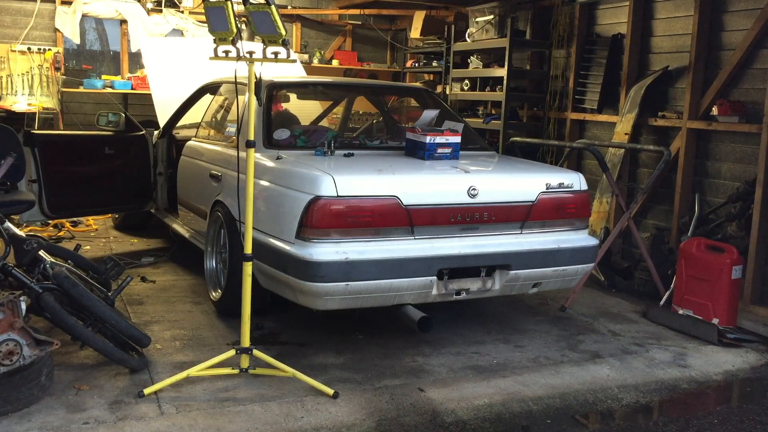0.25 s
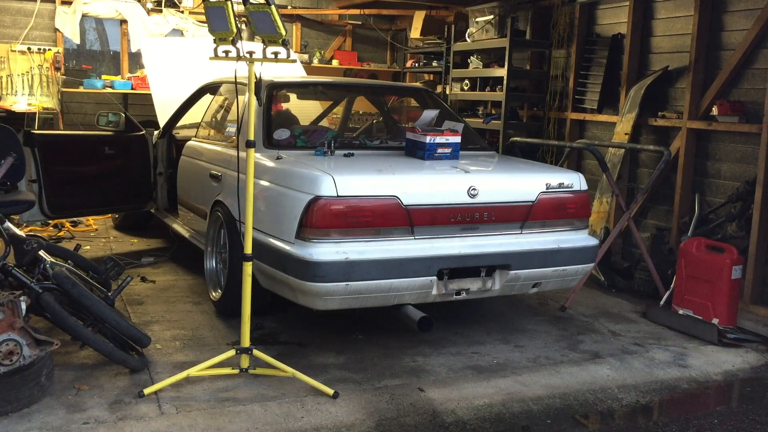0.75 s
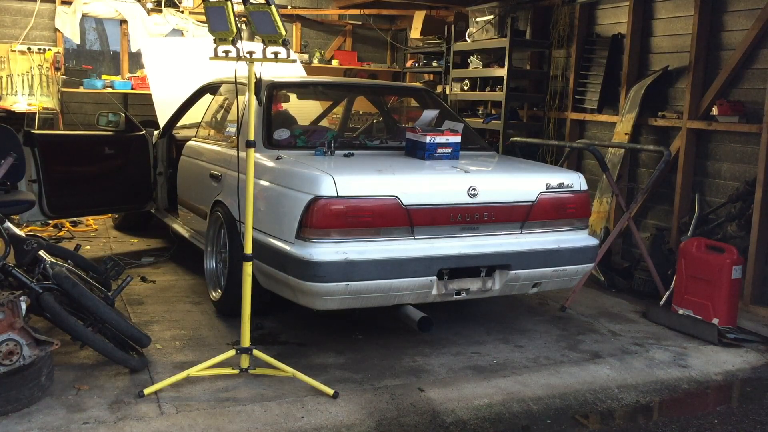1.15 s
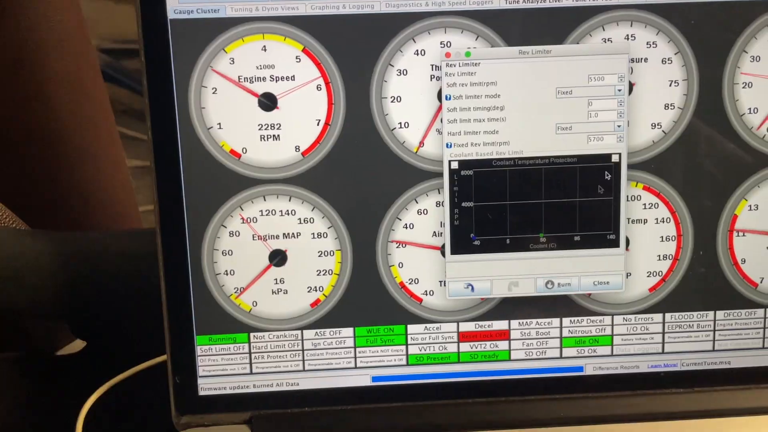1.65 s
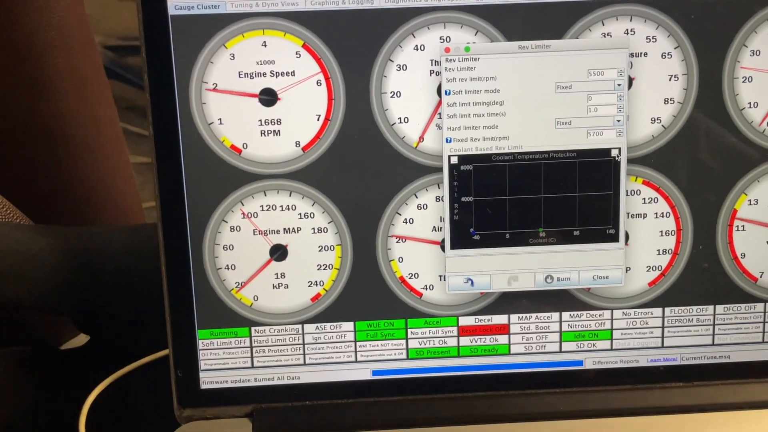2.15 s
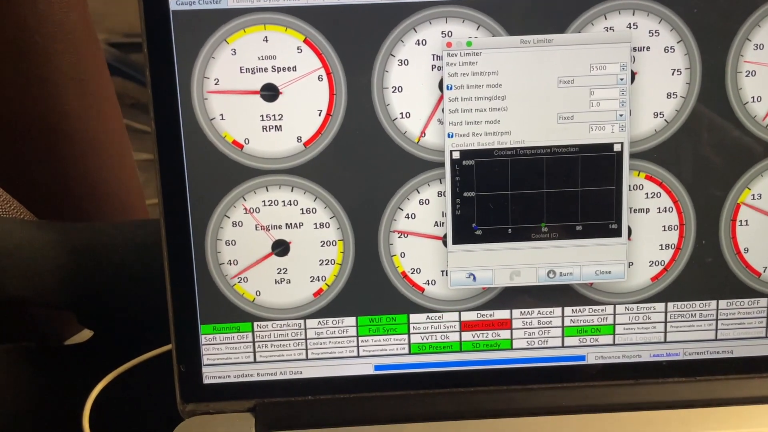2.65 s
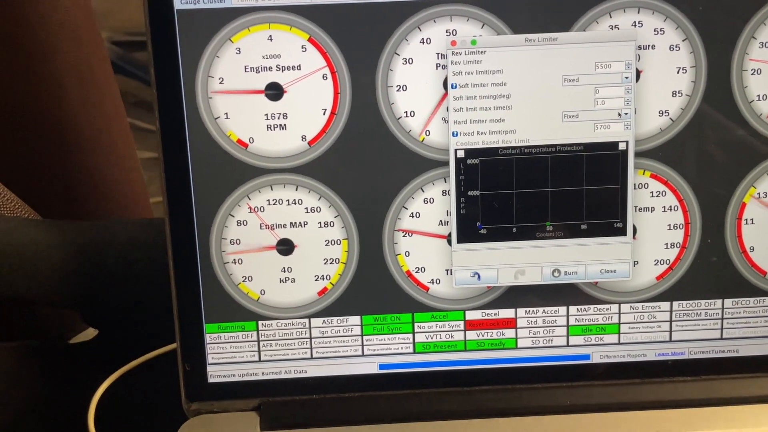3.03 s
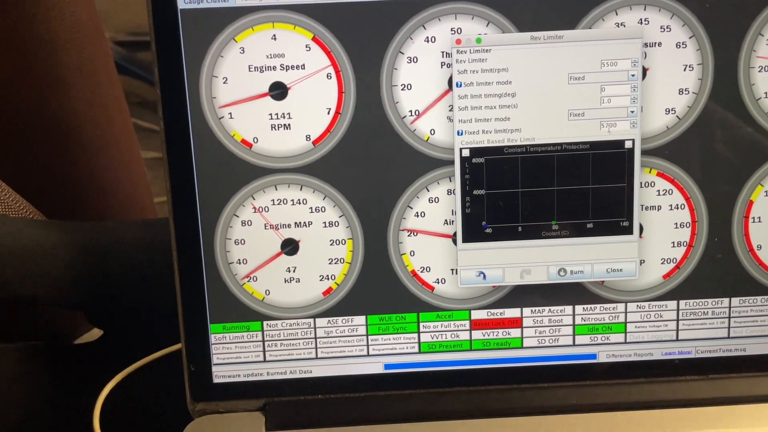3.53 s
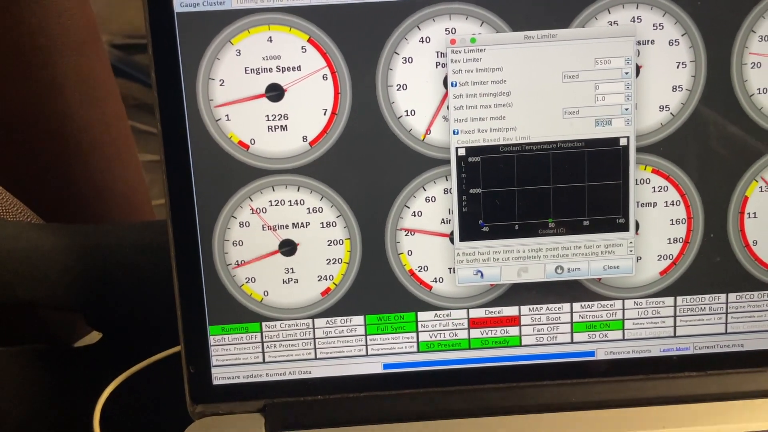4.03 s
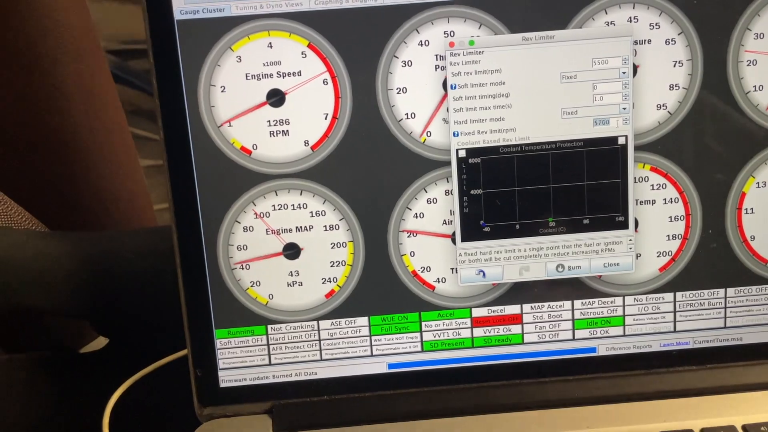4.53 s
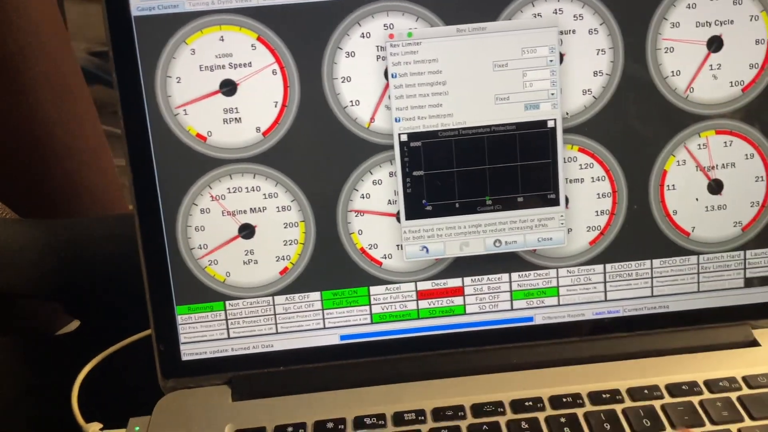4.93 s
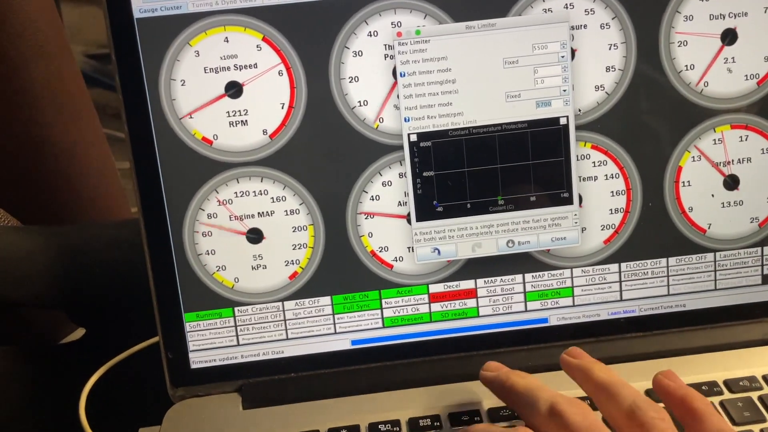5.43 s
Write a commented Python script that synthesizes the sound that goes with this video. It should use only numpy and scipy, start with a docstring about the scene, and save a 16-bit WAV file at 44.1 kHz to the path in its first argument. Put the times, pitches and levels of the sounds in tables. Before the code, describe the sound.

A car engine gives two quick, raspy revs with sharp exhaust cracks, picked up behind the tailpipe in a garage. Then the microphone is suddenly inside the car, where a low, muffled boom rises and falls with repeated light taps on the gas pedal. Air hisses softly on each tap, valves whirr and a turbo whines faintly underneath. A few quiet laptop clicks come late.

```python
"""Revving a turbo engine in a garage

A six-cylinder engine is revved in short bursts, heard from behind the car, then from the driver's seat.
Each firing (fuel burning in a cylinder) booms in the exhaust, rings the pipe and lets out a raspy puff.
Inside, the boom remains, with softer gas, hissing intake air, whirring valves and a few laptop clicks.
The turbo whines faintly underneath."""
import sys
import numpy as np
from scipy import signal
from scipy.fft import rfft, irfft
from scipy.io import wavfile
from scipy.ndimage import uniform_filter1d, minimum_filter1d

SR = 44100
rng = np.random.default_rng(int(sys.argv[2]) if len(sys.argv) > 2 else 0)


def waveform_to_disk(signal):
    """Save audio, clipped to [-1, 1], as 16-bit WAV at the path in sys.argv[1]."""
    frames = np.transpose(np.atleast_2d(signal))
    scaled = np.clip(frames, -1, 1) * 32767
    samples = np.round(scaled).astype(np.int16)
    wavfile.write(sys.argv[1], SR, samples)


N = 250488
T = np.arange(N) / SR

MOVE_INSIDE_S = 1.602
REFERENCE_HZ = 60  # firing rate that speed-dependent levels are counted from

# Levels in the tables are relative: filters and the mix still change them.
# firings per second, which set the engine's pitch: (time [s], rate [Hz])
FIRING_RATE_OUTSIDE = [(0, 44.5), (.1, 49.8), (.17, 49.8), (.25, 55.6), (.33, 64.8), (.41, 67.5), (.6, 57),
                       (.7, 52), (.8, 44), (.9, 39.5), (.98, 42.2), (1.05, 47.6), (1.12, 51), (1.18, 51.7),
                       (1.25, 61.2), (1.35, 68), (1.6, 57.5)]
FIRING_RATE_CABIN = [(1.6, 111), (1.8, 95.7), (2.07, 79.5), (2.11, 80), (2.2, 91), (2.27, 92.5), (2.45, 80),
                     (2.63, 69.7), (2.75, 74), (2.88, 86.5), (3.13, 72.3), (3.31, 60.6), (3.4, 57),
                     (3.49, 64.5), (3.55, 64.5), (3.66, 74.5), (4.2, 43.7), (4.43, 68.5), (5.03, 40),
                     (5.13, 48), (5.19, 48.5), (5.41, 70.5), (5.68, 55.5)]
# taps on the gas pedal: (start [s], length [s], opening [0-1], extra intake hiss [dB])
PEDAL_TAPS = [(0.17, 0.21, 0.6, 0), (1.008, 0.056, 0.88, 0), (1.125, 0.22, 0.96, 0),
              (2.045, 0.11, 0.56, -1), (2.639, 0.064, 0.64, 2.5), (2.722, 0.13, 0.43, -0.5),
              (3.396, 0.06, 0.78, 2.5), (3.517, 0.11, 0.54, -2), (4.226, 0.24, 0.27, -2),
              (5.064, 0.095, 0.51, -0.5), (5.197, 0.19, 0.52, 2.5)]
# laptop clicks: (time [s], level [dB])
LAPTOP_CLICKS = [(4.788, -52.5), (5.089, -43), (5.571, -42), (5.575, -47)]
# the turbo speeding up and coasting down: (time [s], pitch [Hz], level [dB])
TURBO_WHINE = [(0, 640, -55), (.15, 685, -52), (.65, 700, -54), (.85, 690, -66), (1.5, 780, -64),
               (1.8, 745, -58), (2.0, 716, -66), (2.4, 808, -57), (2.85, 802, -52.5), (3.25, 716, -57),
               (3.42, 690, -62), (3.84, 678, -54), (4.1, 638, -59), (4.4, 623, -64)]
# loudness of the valves: (time [s], level [dB])
VALVE_LEVEL = [(1.6, -54), (2.1, -60.5), (2.55, -56), (3.1, -56), (3.35, -66), (3.47, -45.5), (3.58, -59),
               (3.72, -62), (4.1, -59), (4.3, -56.5), (4.7, -63), (4.9, -63.5), (5.68, -57)]
# tone of the valves, the intake air and a hard firing's crack: (frequency [Hz], level [dB])
VALVE_TONE = [(900, -24), (1350, 1.5), (1750, 1), (2000, -10), (3400, -12), (6000, -33)]
INTAKE_TONE = [(900, -22), (1750, -2), (2400, -17), (3100, -13), (3700, 0), (4500, 0), (5400, -13),
               (7500, -15), (11500, -16), (14000, -48)]
CRACK_TONE = [(1500, -29), (4300, -10), (5500, -8), (9000, -1), (15500, -12)]
# tone of the escaping gas: (frequency [Hz], level [dB])
GAS_TONE_OUTSIDE = [(400, -15), (760, -12), (1080, -2), (1500, 1.5), (2100, -3), (2330, -10), (2550, -5),
                    (2950, -4.5), (3600, -11), (4200, -7), (4700, -9), (5400, -17), (6600, -16.5),
                    (9300, -20.5), (10300, -26.5), (11500, -23.5), (15500, -33)]
GAS_TONE_CABIN = [(350, -1.5), (750, 1.5), (950, -3), (1200, -2), (1450, -4.5), (1750, -12.5), (2100, -10),
                  (3000, -9), (4200, -16.5), (5500, -15.5), (7000, -25), (11500, -30), (14000, -48)]
# loudness of the exhaust behind the car: (time [s], drone [dB], rasp [dB], treble [dB])
EXHAUST_LEVELS = [(0, -40, -35, -45), (.08, -39, -35, -47), (.16, -40, -38, -49), (.22, -28, -28.5, -33.5),
                  (.32, -26.5, -29.5, -33), (.38, -28, -33.5, -38), (.5, -30.5, -38, -43),
                  (.73, -40, -39.5, -45), (.8, -37, -41, -48), (.88, -38, -47, -53), (.97, -39, -46, -55),
                  (1.02, -32.5, -36, -46), (1.068, -29.5, -25.5, -28.5), (1.11, -31, -35.5, -42),
                  (1.165, -29, -34.5, -39), (1.178, -27, -26, -28), (1.26, -23, -24.5, -26.5),
                  (1.335, -23.5, -30, -32), (1.375, -28, -38, -43), (1.6, -35, -40, -46)]
# gas in the cabin, a row for rasp and one for sizzle relative to it:
# (coasting level [dB], rise per doubling of speed [dB], rise at full throttle [dB])
CABIN_GAS_FLOW = {"rasp": (-52, 1.3, 17), "sizzle": (-13.5, 1.5, -7)}
# pitches at which the cabin air and the pipe ring: (frequency [Hz], width [Hz], boost [dB])
CABIN_RESONANCES = [(371, 18, 2), (406, 18, 6), (462, 22, 5), (595, 40, 6), (1172, 40, 6), (1380, 40, 4),
                    (1720, 60, 5), (1810, 70, 5), (2117, 30, 6)]
PIPE_RESONANCES = [(895, 35, 5), (1065, 35, 7), (1296, 30, 4), (1385, 45, 2), (1659, 22, 6),
                   (1989, 18, 8.5), (2118, 22, 7), (2471, 20, 5), (2887, 30, 2)]
PIPE_DRONE_RESONANCES = [(326, 29, 3.2), (399.5, 7.2, 12), (445, 16, 12), (520, 36, 11.8), (625, 12, 9.4)]
# share of the rasp in the pipe's two main resonances: (time [s], lower [0-1], upper [0-1])
RESONANCE_SHARES = [(0, 0, .7), (.13, 0, .55), (.2, .2, .12), (.33, .28, .04), (.45, .12, .08),
                    (.8, .03, .12), (1, 0, .12), (1.25, .02, 0), (1.6, .04, .05)]
# single hard firings, most as the throttle snaps open: (time [s], level [dB], extra for the crack [dB])
HARD_FIRINGS = [(.1735, -25.5, -9), (.1935, -21, -6), (.213, -25, -1), (.232, -26, -1), (.267, -28, -1),
                (.284, -28, 0), (.362, -30, 0), (.4214, -29, -2), (.763, -29, -11), (1.0105, -29.5, -10),
                (1.034, -25.5, -1), (1.054, -24, 2), (1.073, -26, 4), (1.133, -22.5, -6), (1.172, -22.5, 2),
                (1.1915, -28, 3), (1.21, -27, 1), (1.26, -23, 1), (1.509, -37, 0), (1.543, -38, 2)]
# tone of the engine's drone: (frequency [Hz], level [dB])
DRONE_TONE_OUTSIDE = [(110, -28.5), (185, -11.5), (215, 8.5), (243, 9.5), (285, 1.5), (325, 2), (365, -7.5),
                      (430, -12), (500, -17.5), (620, -16.5), (760, -26), (900, -10.5), (1500, -84)]
DRONE_TONE_CABIN = [(170, -37), (215, 1.5), (270, 3.5), (330, 7), (420, 4.5), (480, 0), (590, 0.5),
                    (700, -4.5), (850, -13.5), (1200, -46), (5000, -95)]
# loudness of the drone inside: (time [s], level [dB])
DRONE_LEVEL_CABIN = [(1.6, -44.5), (2.04, -44.5), (2.12, -36.5), (2.22, -36.5), (2.35, -44), (2.6, -46),
                     (2.7, -35), (2.88, -40.5), (3.37, -47), (3.45, -36.5), (3.65, -40.5), (4.15, -53.5),
                     (4.33, -42), (4.48, -37), (4.55, -46), (5.03, -51), (5.37, -33), (5.46, -41.5),
                     (5.68, -48.5)]
# low resonances shaken by uneven firings: (frequency [Hz], level [dB])
SHAKE_TONE_OUTSIDE = [(25, -42.5), (40, -26), (54, 1.5), (72, -35), (92, -3), (125, -14), (160, -2),
                      (200, -9.5), (240, -15), (330, -96), (1500, -110)]
SHAKE_TONE_CABIN = [(25, -42.5), (40, -8.5), (53, 9), (68, 6), (88, 10), (110, 8.5), (140, 8.5), (195, 7),
                    (235, -13), (330, -61), (1500, -110)]
# boom tones at 1, 2 and 3 times the firing rate: (time [s], first [dB], second [dB], third [dB])
BOOM_LEVELS_OUTSIDE = [(0, -29, -38, -33), (.1, -34, -29, -29), (.2, -30, -21, -29), (.3, -20, -15.5, -26),
                       (.4, -36, -29, -20.5), (.55, -25, -17.5, -26), (.65, -24, -23.5, -24.5),
                       (.75, -28.5, -32, -33), (.87, -43, -29, -36), (.97, -45, -38, -24),
                       (1.07, -23, -15.5, -24), (1.13, -38, -29, -25), (1.2, -24, -13, -23),
                       (1.27, -17, -13, -24), (1.31, -20, -18, -20), (1.35, -35, -25, -22.5),
                       (1.42, -27, -21, -24), (1.52, -28, -20, -27), (1.6, -28, -23, -26)]
BOOM_LEVELS_CABIN = [(1.6, -20, -34, -65), (1.75, -21.5, -39, -48), (1.949, -23, -28, -57),
                     (2.05, -22.5, -38, -57), (2.08, -28.5, -31, -53), (2.15, -16.5, -24.5, -43.5),
                     (2.28, -30, -25.5, -47.5), (2.3, -21, -23, -44.5), (2.45, -20.5, -38, -59),
                     (2.65, -28, -21.5, -41.5), (2.72, -21.5, -35, -37.5), (2.75, -35.5, -25.5, -43),
                     (2.82, -18.5, -28, -34), (2.97, -20.5, -31.5, -51), (3.12, -28.5, -24.5, -44.5),
                     (3.35, -29.5, -33.5, -30), (3.37, -32, -51, -54), (3.4, -27, -24.5, -38),
                     (3.5, -20, -28.5, -38), (3.52, -32.5, -30.5, -41), (3.65, -22, -21, -47),
                     (3.67, -20, -42, -37), (3.7, -34, -28, -43.5), (3.95, -24.5, -28, -30.5),
                     (4.149, -25, -33.5, -34.5), (4.2, -39, -24.5, -34), (4.371, -19, -25.5, -30.5),
                     (4.4, -35, -24.5, -41), (4.5, -27, -28, -37.5), (4.65, -25.5, -26, -34),
                     (4.72, -22.5, -29.5, -28.5), (4.87, -25.5, -29, -34), (4.94, -40, -26, -37),
                     (5.02, -39, -38, -38), (5.09, -37, -22.5, -31.5), (5.139, -28, -19, -23.5),
                     (5.17, -27, -36, -43), (5.22, -23.5, -23.5, -24.5), (5.32, -18, -22.5, -30.5),
                     (5.54, -27, -25.5, -33.5), (5.68, -23, -25.5, -35)]
# strength of each of the six cylinders: (level [dB])
CYLINDER_DB = np.array([1.4, -0.7, 2.0, -1.5, 1.5, -0.5])


def undb(db):
    """Turn decibels into a volume multiplier."""
    return 10 ** (np.asarray(db) / 20)


def unit(x):
    """Scale a signal to an average (rms) size of 1."""
    return x / np.sqrt(np.mean(x ** 2))


def curves(table):
    """Join a table's timed points with straight lines, one curve per column."""
    times, *columns = np.transpose(table)
    return [np.interp(T, times, column) for column in columns]


def band(x, low_hz, high_hz, order=2):
    """Keep the sound between two frequencies."""
    return signal.sosfilt(signal.butter(order, [low_hz, high_hz], "bandpass", fs=SR, output="sos"), x)


def colour(x, tone, resonances=()):
    """Filter a sound through a tone table, with narrow ringing peaks on top."""
    size = 16384
    freqs = np.maximum(np.arange(size // 2 + 1) * SR / size, 1)
    hz, db = np.transpose(tone)
    shape_db = np.interp(np.log(freqs), np.log(hz), db)
    for centre, width, boost in resonances:
        shape_db += boost / (1 + (2 * (freqs - centre) / width) ** 2)
    # make the filter ring only after a sound, never before it
    cepstrum = irfft(np.log(undb(shape_db)))
    cepstrum[1:size // 2] *= 2
    cepstrum[size // 2 + 1:] = 0
    return signal.fftconvolve(x, irfft(np.exp(rfft(cepstrum))))[:N]


def wander(rate_hz):
    """A smooth random wiggle of about size 1."""
    hold = int(SR / rate_hz)
    steps = np.repeat(rng.standard_normal(N // hold + 1), hold)
    return unit(uniform_filter1d(uniform_filter1d(steps, hold), hold)[:N])


def throttle():
    """Engine load (0-1) and extra hiss (dB): on each pedal tap the intake pipes fill, then empty."""
    fill_s, empty_s = 0.057, 0.045
    load, hiss_db = np.zeros((2, N))
    for start, length, opening, extra_db in PEDAL_TAPS:
        shape = np.clip((T - start) / fill_s, 0, 1) * np.exp(-np.maximum(T - start - length, 0) / empty_s)
        load = np.maximum(load, opening * shape)
        hiss_db += extra_db * shape
    return load, hiss_db


def idle_sag(hz):
    """Gas flow drops by up to 4.5 dB as the engine slows below 50 firings a second."""
    return -4.5 * np.clip((50 - hz) / 9, 0, 1)


def firings(cycles, hz, scatter_db):
    """One pulse each time cycles passes a whole number, plus each firing's uneven strength."""
    count = cycles.astype(int)
    random_db = scatter_db * rng.standard_normal(N // 100)[count]
    strength = undb(CYLINDER_DB[count % len(CYLINDER_DB)] + random_db)
    return np.diff(count, prepend=count[0]) * strength / np.sqrt(hz), strength


def puffs(cycles, hz, strength, puff_s, flow):
    """Swirling gas bursts out as each valve opens, then dies down to a steady flow."""
    age_s = cycles % 1 / hz
    return unit(rng.standard_normal(N) * (strength * np.exp(-age_s / puff_s) + flow))


def room(x, fade_s, echo_db, side_db):
    """Add dense echoes from the walls; side_db sets how much left and right differ."""
    t = T[:SR // 2]
    tails = rng.standard_normal((2, len(t))) * undb(-60 * t / fade_s) * (t > .003)
    middle, side = (signal.fftconvolve(x, tail / np.linalg.norm(tail))[:N] for tail in tails)
    echoes = undb(echo_db) * middle + undb(side_db) * side * np.array([[1], [-1]])
    return (x + echoes) / np.sqrt(1 + undb(2 * echo_db))


def laptop():
    """Small, dry plastic ticks, each a tiny burst of noise."""
    ticks = np.zeros(N)
    for start, db in LAPTOP_CLICKS:
        ticks += undb(db) * (T >= start) * np.exp(-np.abs(T - start) / 0.0021) * rng.standard_normal(N)
    return colour(ticks, [(1000, -34.5), (4000, -3), (6000, -4), (10000, -9), (15000, -19)])


def turbo():
    """The turbo's heavy rotor changes speed slowly and sings faintly, one wave per turn."""
    hz, db = curves(TURBO_WHINE)
    turns = np.cumsum(hz) / SR + 0.14 * wander(60)
    return np.sqrt(2) * np.sin(2 * np.pi * turns) * undb(db + 2 * wander(25))


def valves(cycles, hz):
    """The valves tick twice per firing and blur into a metallic whirr."""
    ticks = puffs(2 * cycles, 2 * hz, strength=0.86, puff_s=0.0022, flow=0.22)
    return unit(colour(ticks, VALVE_TONE, CABIN_RESONANCES)) * undb(curves(VALVE_LEVEL)[0])


def intake(load, hiss_db):
    """Air hisses in through the open throttle; a little leaks by when it is shut."""
    leak = 0.036
    return unit(colour(rng.standard_normal(N), INTAKE_TONE)) * (leak + load) * undb(hiss_db - 52)


def cabin_gas(gas, hz, load):
    """Exhaust gas muffled by the car's body: a rasp and a quieter sizzle that grow with speed and load."""
    rasp_db, sizzle_db = (db + speed_db * np.log2(hz / REFERENCE_HZ) + load_db * load
                          for db, speed_db, load_db in CABIN_GAS_FLOW.values())
    muffled = colour(gas, GAS_TONE_CABIN, CABIN_RESONANCES)
    rasp = signal.sosfiltfilt(signal.butter(3, 2710, fs=SR, output="sos"), muffled)
    sizzle = muffled - rasp
    return undb(rasp_db + idle_sag(hz)) * (unit(rasp) + undb(sizzle_db) * unit(sizzle))


def pipe_rattle(cycles, hz, ring_s):
    """Each firing's shock rattles down the pipe by the same paths, a little early or late."""
    pulses, _ = firings(cycles + 0.011 * wander(60), hz, scatter_db=1)
    t = T[:SR // 20]
    paths = rng.standard_normal(len(t)) * np.exp(-t / ring_s)
    return unit(signal.fftconvolve(pulses, paths)[:N])


def tailpipe(cycles, hz, load, strength):
    """Gas leaving the pipe: a rasp in shifting resonances, and a treble that spits once per firing."""
    rattle = (.3 + .35 * load) * pipe_rattle(cycles, hz, ring_s=.011)
    soft = puffs(cycles, hz, strength, puff_s=.006, flow=.7 - .3 * load) + rattle
    sharp = puffs(cycles, hz, strength, puff_s=.005, flow=.45 - .1 * load) + rattle
    rasp = unit(band(colour(soft, GAS_TONE_OUTSIDE, PIPE_RESONANCES), 300, 2560, order=5))
    treble = unit(band(colour(sharp, GAS_TONE_OUTSIDE, PIPE_RESONANCES), 2560, 19000, order=5))
    lower, upper = curves(RESONANCE_SHARES)
    rasp *= np.sqrt(1 - lower - upper)
    for edges_hz, share in (((1030, 1100), lower), ((1340, 1630), upper)):
        gas = puffs(cycles, hz, strength, puff_s=.005, flow=.3)
        rasp += np.sqrt(share) * unit(band(gas, *edges_hz))
    return rasp, treble


def barks():
    """A hard firing is a burst of gas that dies in milliseconds, with a bright crack on top."""
    bursts, cracks = np.zeros((2, N))
    for start, db, crack_db in HARD_FIRINGS:
        burst = undb(db) * (T >= start) * np.exp(-np.abs(T - start) / 0.004)
        bursts += burst
        cracks += burst * undb(crack_db)
    noise = rng.standard_normal(N)
    pipe_gain = np.std(colour(noise, GAS_TONE_OUTSIDE, PIPE_RESONANCES))
    gas = colour(noise * bursts, GAS_TONE_OUTSIDE, PIPE_RESONANCES) / pipe_gain
    return gas + colour(rng.standard_normal(N) * cracks, CRACK_TONE)


def drone(growl, tone, resonances, db):
    """The engine's overtones ring in the pipe or cabin; db sets their level at 260-700 Hz."""
    ringing = colour(growl, tone, resonances)
    return ringing / np.std(band(ringing, 260, 700, order=6)) * undb(db)


def boom(cycles, hz, load, levels, shake_tone, shake_db, stumble_db, waver_db, wobble):
    """The firings make three deep tones that swell and fade; uneven firings add a lumpy shake."""
    drive = (load - .18) / .13  # below zero the engine coasts, above zero it pulls
    uneven = undb(-7 * np.log2(hz / REFERENCE_HZ))  # burning steadies as the engine speeds up
    phase = cycles + wobble * uneven * wander(24)
    # the lowest tone comes later when pulling than when coasting
    lag = .12 * uniform_filter1d(np.tanh(drive), size=2000)
    tones = np.zeros(N)
    for harmonic, db in enumerate(curves(levels), 1):
        wave = np.sqrt(2) * np.sin(2 * np.pi * harmonic * (phase - lag * (harmonic == 1)))
        tones += wave * undb(db + waver_db * uneven * wander(40))
    pulses, _ = firings(cycles, hz, scatter_db=2.5)
    shake = unit(colour(pulses * rng.standard_normal(N).clip(-1, 1), shake_tone))
    stumble = np.exp(-drive ** 2)  # strongest between coasting and pulling
    return tones + shake * uneven * undb(shake_db + idle_sag(hz) + stumble_db * stumble)


def outside():
    """Behind the car, every firing cracks out of the tailpipe and around the garage."""
    hz, = curves(FIRING_RATE_OUTSIDE)
    cycles = np.cumsum(hz) / SR + .6
    load, _ = throttle()
    drone_db, rasp_db, treble_db = curves(EXHAUST_LEVELS)
    pulses, strength = firings(cycles + .02 * wander(60), hz, scatter_db=1.4)
    growl = np.roll(unit(pulses), 170) + .6 * rng.standard_normal(N)
    hum = drone(growl, DRONE_TONE_OUTSIDE, PIPE_DRONE_RESONANCES, drone_db - 2.5)
    rasp, treble = tailpipe(cycles, hz, load, strength)
    gas = rasp * undb(rasp_db - 2.3) + treble * undb(treble_db - 2.55)
    bass = boom(cycles, hz, load, BOOM_LEVELS_OUTSIDE, SHAKE_TONE_OUTSIDE,
                shake_db=-31, stumble_db=3, waver_db=1.1, wobble=.014)
    return bass + hum + turbo() + room(gas + barks(), fade_s=0.17, echo_db=-8, side_db=-62)


def cabin():
    """In the driver's seat, the car's body lets the boom through and muffles the gas."""
    hz, = curves(FIRING_RATE_CABIN)
    cycles = np.cumsum(hz) / SR
    load, hiss_db = throttle()
    pulses, strength = firings(cycles + .035 * wander(70), hz, scatter_db=1.5)
    gas = puffs(cycles, hz, strength, puff_s=0.032, flow=1.0)
    gas_share = .62 + .2 * load  # the overtones come clear of the gas as the throttle shuts
    growl = np.sqrt(1 - gas_share) * unit(pulses) * (1 + 0.49 * wander(50)) + np.sqrt(gas_share) * gas
    hum = drone(growl, DRONE_TONE_CABIN, CABIN_RESONANCES, curves(DRONE_LEVEL_CABIN)[0] - 0.6)
    rush = cabin_gas(gas, hz, load) + intake(load, hiss_db)
    bass = boom(cycles, hz, load, BOOM_LEVELS_CABIN, SHAKE_TONE_CABIN,
                shake_db=-34, stumble_db=6, waver_db=1.5, wobble=.016)
    # left and right sit at different places in the cabin's standing waves
    bass_left = colour(bass, [(60, 0.76), (110, -1.4), (200, -0.57)])
    bass_right = colour(np.roll(bass, 18), [(60, 1.7), (110, 1.4), (200, 1.6)])
    middle = room(hum + turbo(), fade_s=0.14, echo_db=-4.5, side_db=-10)
    treble = room(rush + valves(cycles, hz), fade_s=0.069, echo_db=-8.5, side_db=-1.5)
    open_door = undb([[1.2], [-1.2]])  # the treble comes in by the open door on the left
    return np.array([bass_left, bass_right]) + middle + open_door * treble


def scene():
    """The listener jumps from behind the car to the driver's seat."""
    inside = np.clip((T - MOVE_INSIDE_S) / .004 + .5, 0, 1)
    return (1 - inside) * outside() + inside * cabin() + laptop()


def record(dry):
    """Thin the deepest bass, hold down the loudest peaks, fade the ends and cut the highest treble."""
    ceiling, top_hz = .48, 15800
    thinned = signal.sosfilt(signal.butter(6, 37, "highpass", fs=SR, output="sos"), dry)
    needed_gain = ceiling / np.maximum(np.abs(thinned).max(axis=0), ceiling)
    gain = uniform_filter1d(minimum_filter1d(needed_gain, size=900), size=900)
    fades = np.clip(np.minimum(T, T[-1] - T) / .004, 0, 1)
    return signal.sosfilt(signal.ellip(8, .2, 70, top_hz, fs=SR, output="sos"), fades * gain * thinned)


dry = scene()
out = record(dry)
waveform_to_disk(out)
```